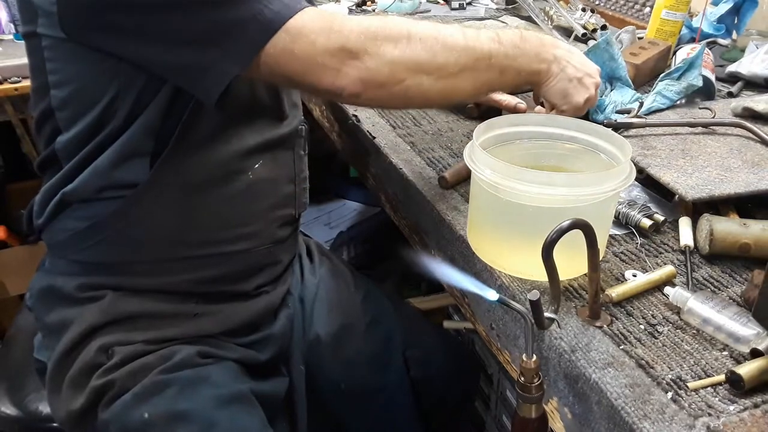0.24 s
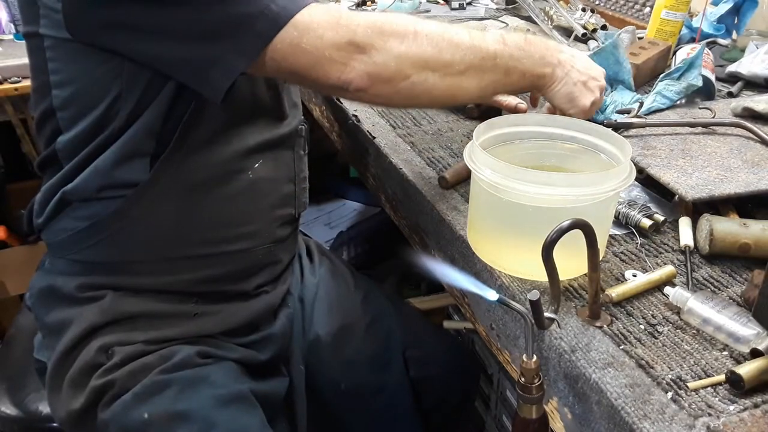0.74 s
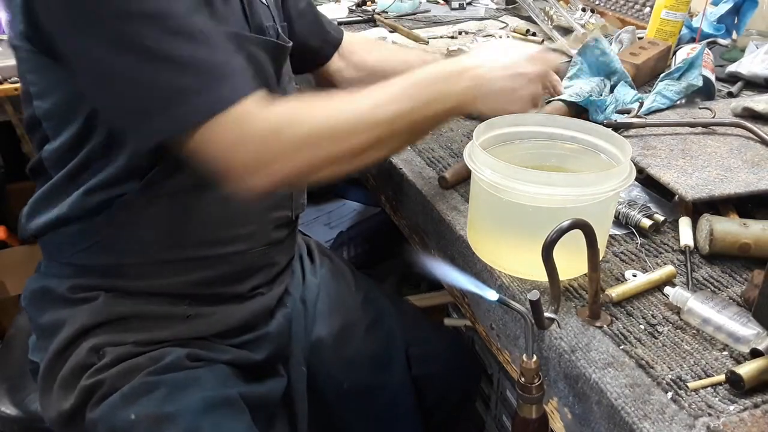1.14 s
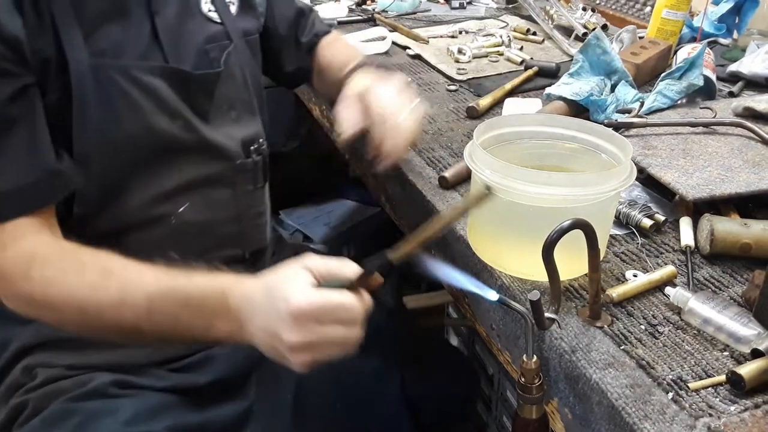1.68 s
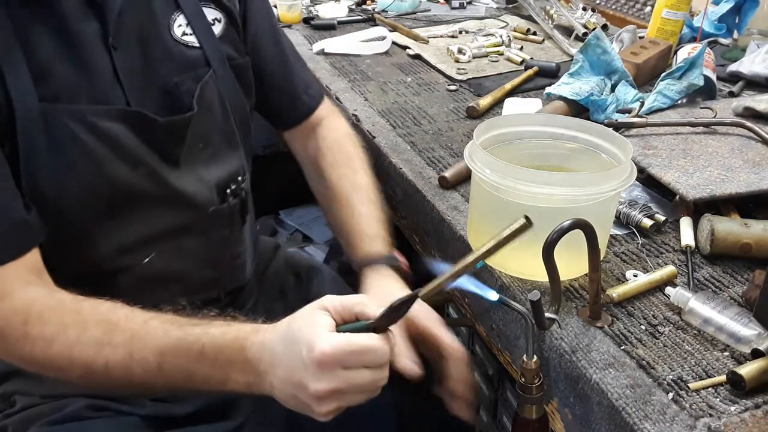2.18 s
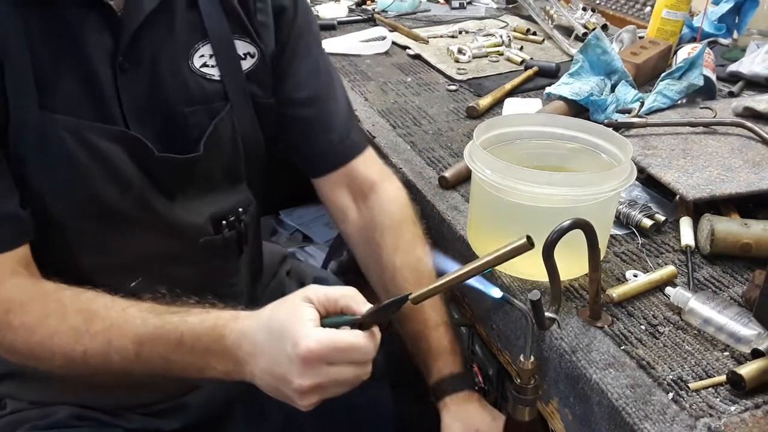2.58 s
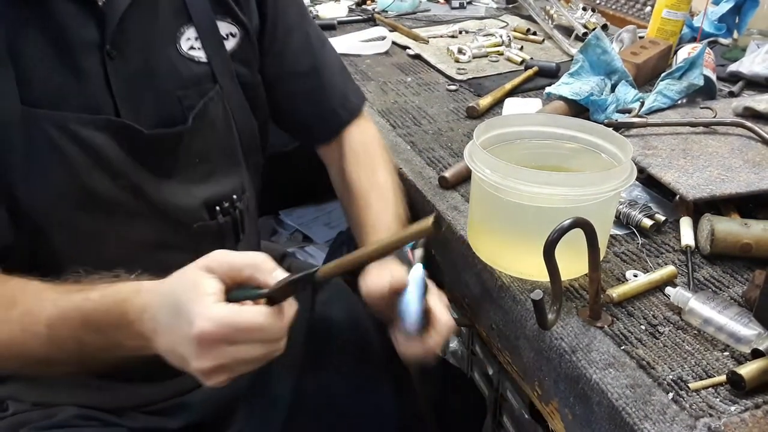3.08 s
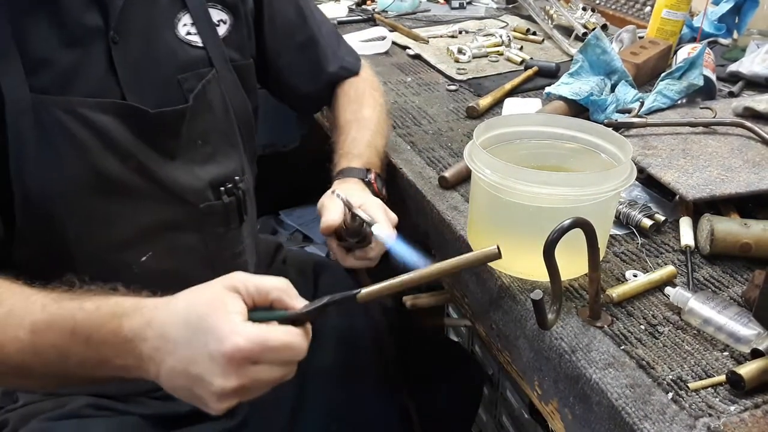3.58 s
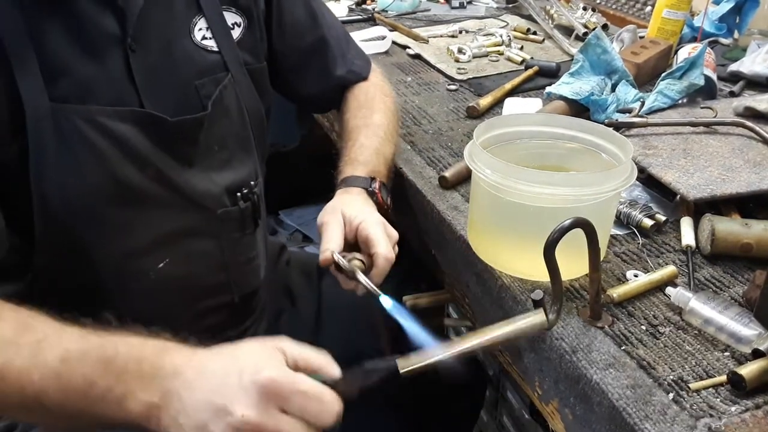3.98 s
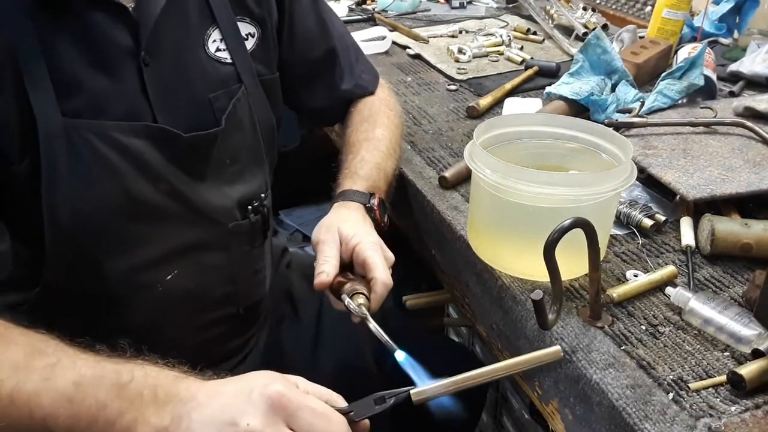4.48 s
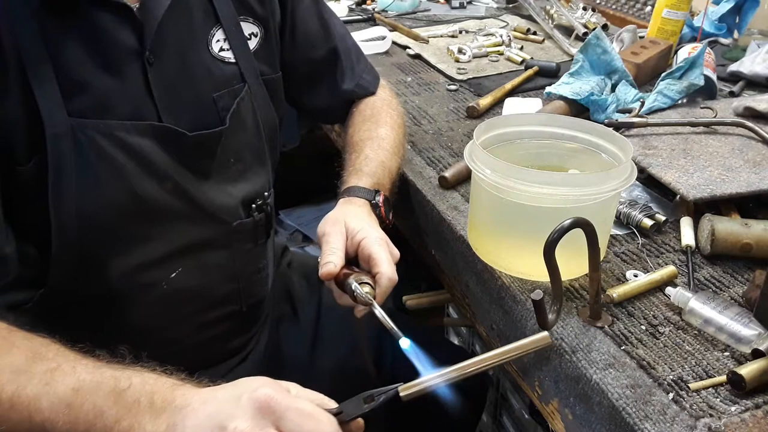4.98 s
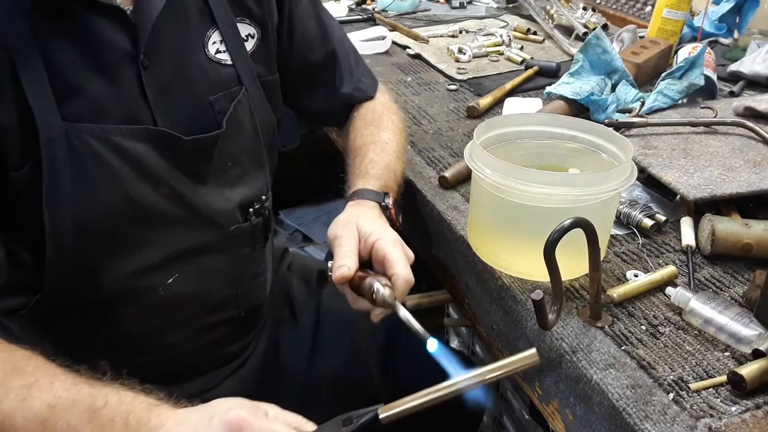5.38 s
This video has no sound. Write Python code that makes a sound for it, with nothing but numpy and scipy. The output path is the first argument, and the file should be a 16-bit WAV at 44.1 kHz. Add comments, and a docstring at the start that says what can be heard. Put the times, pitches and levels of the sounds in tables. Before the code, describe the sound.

Close in a small workshop, a burning gas torch gives a continuous bright hiss with a softer roar beneath. It stays steady on its stand, then around three seconds drops, dulls and wobbles as it is lifted and swung round, recovering by about four seconds as it is aimed at a metal tube. A quiet extractor fan rushes and hums throughout. Close stereo microphones, fairly dry.

```python
"""At a workshop bench, a gas torch hisses on its stand, is picked up, swung round and aimed at a brass tube.
The jet is turbulent noise coloured by the short pipe of the tip; the flame is a softer, lower band of noise.
A near surface returns an echo whose delay shifts as the torch moves; brief close reflections comb the hiss.
An extractor fan adds a steady rush of air and a few wavering motor tones."""
import sys
import numpy as np
from scipy import signal
from scipy.fft import rfft, irfft
from scipy.io import wavfile
from scipy.ndimage import uniform_filter1d

SR = 44100
rng = np.random.default_rng(int(sys.argv[2]) if len(sys.argv) > 2 else 0)


def file_out(sig):
    """Save sig as 16-bit WAV at sys.argv[1]."""
    # one column per channel
    cols = np.atleast_2d(sig).T
    # limit, then scale
    lim = np.clip(cols, -1, 1)
    pcm = np.round(lim * 32767).astype(np.int16)
    wavfile.write(sys.argv[1], SR, pcm)


N = 248988

# motion of the torch; pose 0 on the stand, 1 aimed, 2 turned away (clipped to 0-2): time_s, left_lead_ms, pose
TORCH_PATH = [(2.1, -0.006, 0.027), (2.7, -0.014, 0.41), (2.89, -0.02, 2.3), (3.08, 0.081, 2.1),
              (3.57, 0.13, 1.2), (4.03, 0.025, 1.13), (4.6, 0.034, 0.75), (5.4, 0.018, 1.2)]
# hiss at 3-5.6 kHz and above, before spreading, flares and flutter: time_s, level_db, treble_db
HISS_LEVELS = [(0, -31.5, -34), (0.55, -31.6, -34), (2.0, -34, -34.5), (2.45, -34, -35), (2.68, -33, -36),
               (2.75, -34.5, -36.5), (2.87, -36.5, -38.5), (2.98, -40, -43), (3.1, -39.5, -41),
               (3.31, -33.5, -37), (3.42, -41.5, -40), (3.53, -37, -41), (3.64, -37.5, -41.5),
               (3.82, -36, -37.5), (3.9, -37.3, -36.5), (4.01, -38.8, -34), (4.08, -34.5, -34.5),
               (4.3, -34.5, -35), (4.55, -34, -34.5), (4.8, -34, -35.5), (5.05, -34.5, -35.5),
               (5.25, -34.5, -34), (5.37, -35.5, -37.5), (5.5, -33.5, -34.5), (5.65, -33, -33)]
# left-right imbalance that the hiss approaches at the shortest waves: time_s, left_minus_right_db
TREBLE_BEAM = [(2.55, 0), (2.84, -5.5), (3.25, 0.5), (3.8, -2.5), (3.94, 10), (4.12, 6), (4.3, 2),
               (4.62, 4), (4.77, -1.5), (4.95, 2.5), (5.12, 0), (5.24, 3), (5.35, 10), (5.6, -1)]
# relative spectral density of the jet in each pose: frequency_hz, density_db
JET_STAND_SPECTRUM = [(1400, -21), (1850, -10.5), (2250, -4), (2730, -5), (3050, -6.5), (3400, -4),
                      (4190, -0.5), (4350, -2.5), (5150, -7), (5500, -7), (6670, -12.5), (7800, -10),
                      (9110, -15), (11060, -18), (11960, -11.5), (12550, -16.5), (13300, -16),
                      (14530, -22.5), (15700, -16.0)]
JET_AIMED_SPECTRUM = [(1400, -17), (1850, -7), (2520, -5), (3310, 1.5), (3580, -2), (4350, 1), (4700, -4),
                      (4890, 1.5), (5400, -5), (6170, -9.5), (7200, -9), (7700, -11), (8110, -7.5),
                      (8700, -11.5), (11060, -16), (11960, -9), (15100, -24), (15700, -11)]
JET_AWAY_SPECTRUM = [(1400, -16), (1850, -7), (3070, 3), (3190, -1.5), (3870, 5), (5080, -0.5), (7800, -12),
                     (8110, -6.5), (8430, -10.5), (10240, -12), (10640, -16), (11960, -8), (14530, -20),
                     (15700, -13)]
# gliding resonances and hollows of the hiss; where start_s exceeds end_s the lift acts with reversed sign:
# start_s, end_s, first_hz, last_hz, width_hz, left_lift_db, right_lift_db
JET_RESONANCES = [(-1, 1.15, 4740, 4750, 170, 0.5, 7.5), (-1, 1.2, 4400, 4600, 160, -4, -3.5),
                  (0.5, 2.58, 4160, 4120, 180, 2, 1), (-0.5, 2.56, 2050, 2160, 350, -1.5, -1.5),
                  (0.5, 2.7, 7600, 7600, 260, 4.5, -6), (2.57, 2.84, 4600, 5600, 340, 4, 3.5),
                  (3, 3.05, 4250, 4400, 380, -7, -2), (4, 2.85, 11900, 11100, 440, 7, 5),
                  (2.95, 3.42, 4300, 4800, 1500, -3, 1), (3, 3.25, 2550, 2700, 580, 2, 3.5),
                  (3, 3.12, 6000, 6300, 260, -9, -8), (4, 4.07, 4500, 4500, 1500, 2, -2.5),
                  (5, 5.3, 3500, 3700, 230, -2, -2.5), (3.4, 3.97, 4300, 4150, 380, -2, -2),
                  (3, 3.93, 4800, 5000, 470, 2.5, 2.5), (3, 4, 6300, 6500, 250, 4.5, 7),
                  (1.5, 3.7, 6800, 7950, 280, 3.5, 1.5), (3, 4.5, 6750, 7100, 500, -1, -7),
                  (4, 4.1, 10800, 10800, 600, 0, -4), (4.5, 4.5, 4150, 2600, 250, 3, 4),
                  (4.65, 5.1, 4300, 4550, 230, -0.5, 3), (5, 7, 6460, 6460, 100, 5, 3)]
# brief swells and dips of part of the hiss, near 4.6 kHz or in the top of the treble:
# centre_s, half_length_s, frequency_hz, width_hz, lift_db
JET_FLARES = [(1.07, 0.036, 4550, 1200, 2.5), (1.68, 0.04, 4530, 1200, 4), (2.66, .045, 4600, 900, 0.5),
              (4.3, 0.13, 12300, 3500, 0), (5.11, 0.028, 4600, 1200, 4), (5.1, .16, 12000, 3500, -1.5)]
# echo of the jet off a near surface: time_s, delay_ms, strength (pressure ratio)
SURFACE_ECHO = [(2.6, 5, .18), (2.9, 5.15, 0.28), (3.2, 5.15, 0.44), (3.35, 5.02, 0.6), (3.5, 5.08, .25),
                (3.75, 5.06, .5), (3.9, 4.98, .25), (4.15, 4.89, .4), (4.4, 4.85, 0.26), (4.7, 4.93, .33),
                (5.0, 5.1, .3), (5.35, 5.05, .35), (5.65, 4.97, 0.31)]
# diffuse sound at the bench by pitch, before the pose scales it: frequency_hz, diffuse_db
DIFFUSE_COLOUR = [(1750, 2), (2150, -3), (2800, -3.5), (3250, 3.5), (3650, -4), (4300, 2), (5700, -0.5),
                  (6800, 2.5), (7450, 2.5), (8250, 8), (9200, -2), (10200, 2.5), (15000, 7)]
# brief reflections off something close, such as the tube:
# start_s, end_s, first_delay_ms, last_delay_ms, strength (pressure ratio)
CLOSE_REFLECTIONS = [(3.28, 3.7, 1.26, 1.2, 0.16), (3.92, 4.05, 1.05, 0.97, 0.27),
                     (4.12, 4.22, .78, .72, 0.24)]
# relative spectral density of the flame in each pose: frequency_hz, density_db
FLAME_STAND_SPECTRUM = [(330, -37), (455, -2), (540, -14.5), (680, -6), (760, -11.5), (900, -15.5),
                        (1050, -4.5), (1200, -5.5), (1450, 0), (1630, -1), (1800, -7.5), (2100, -36)]
FLAME_AIMED_SPECTRUM = [(760, -11), (880, -22.5), (1000, 0.5), (1220, 1), (1350, -0.5), (1450, 1),
                        (1590, 2), (1720, -17), (2000, -19)]
FLAME_AWAY_SPECTRUM = [(740, -26), (860, -17), (960, -2.5), (1180, -3.5), (1330, -2.5), (1450, -1),
                       (1570, -2), (1680, -5), (2000, -19)]
# resonances and hollows of the roar as the flame passes the bench and the body:
# start_s, end_s, first_hz, last_hz, width_hz, lift_db
FLAME_RESONANCES = [(1.8, 3.4, 620, 650, 130, 5.5), (2, 2.9, 1400, 1470, 79, -7.5),
                    (1, 2.75, 820, 860, 100, -3), (-0.5, 1.2, 1420, 1430, 88, 3),
                    (2.55, 3.4, 1610, 1430, 90, 3.5), (3, 3.3, 920, 1000, 150, 3),
                    (3.5, 3.9, 1350, 1460, 120, -3), (3, 3.9, 1140, 1220, 100, 5),
                    (4, 4.7, 1170, 1400, 72, 4), (5.02, 5.4, 1350, 1410, 81, 4)]
# correlation of the roar at the two microphones: frequency_hz, correlation (0-1)
FLAME_CORRELATION = [(450, 1), (700, 0.9), (1000, 0.74), (1300, 0.75), (1700, 0.59)]
# relative spectral density of the fan's air noise: frequency_hz, density_db
FAN_SPECTRUM = [(20, -23), (60, -13.5), (110, -11), (150, -5), (215, 2), (260, -1.5), (285, -6), (380, -3),
                (450, 2.5), (540, -3.5), (650, 1), (745, -9.5), (820, -1), (2000, -21.5)]
# correlation of the air noise at the two microphones: frequency_hz, correlation (0-1)
FAN_CORRELATION = [(30, .82), (70, 0.76), (140, 0.93), (300, 0.89), (800, 0.72)]
# tones of the fan motor: frequency_hz, level_db
MOTOR_TONES = [(241.8, -50.5), (301, -60.5), (325, -60)]

FRAME, HOP = 2048, 512  # samples
TIME = np.arange(N) / SR
FRAME_TIME = np.arange(-(-N // HOP) + 1) * HOP / SR
HZ = np.fft.rfftfreq(FRAME, 1 / SR)[:, None]
TURN_PER_MS = 2j * np.pi * HZ / 1000  # phase turned by each ms of delay
SIDE = np.array([1, -1])[:, None, None]  # left, right

# share of power that arrives directly while the tip faces the microphones
DIRECT_SHARE = 0.94
# below this treble level the tip points away; slope 1.9 makes the direct power fall 0.95 dB per treble dB
FACING_TREBLE_DB, DIRECT_LOSS = -36, 1.9
LIFTED_S, NEW_CLUTTER_S = 2.55, 0.452  # from the lift on, the small reflections renew themselves this often
ROAR_DB, ROAR_HAND_DB = -42.5, 0.8  # base level of the roar at 0.9-1.8 kHz; rise in the hand
SWEEP_AT_S, SWEEP_S, SWEEP_DB = 2.9, 0.32, 0.9  # the flame roars up as it is swept off the stand
FAN_DB = -46.5  # rms level of the air noise


def amp(db):
    """Logarithmic level: decibels to a pressure ratio."""
    return 10 ** (np.asarray(db) / 20)


def unit(x):
    """Normalisation of mean power: scales to an rms of 1."""
    return x / np.sqrt(np.mean(x ** 2) + 1e-20)


def spectra(x):
    """Short-time Fourier analysis into bins x frames."""
    return signal.stft(x, nperseg=FRAME, noverlap=FRAME - HOP)[2]


def sound(z):
    """Overlap-add synthesis of short-time spectra into samples."""
    return signal.istft(z, nperseg=FRAME, noverlap=FRAME - HOP)[1][..., :N]


def controls(rows):
    """Linear interpolation in time: each column of a curve, read once a frame."""
    s, *columns = np.transpose(rows)
    return [np.interp(FRAME_TIME, s, column) for column in columns]


def colour(points):
    """Interpolation over logarithmic frequency, read at every bin."""
    hz, value = np.transpose(points)
    return np.interp(np.log(HZ + 1), np.log(hz), value)


def shape(points):
    """Band-limited spectrum in dB, falling 20 dB per octave beyond its ends."""
    inside = np.clip(HZ + 1, points[0][0], points[-1][0])
    octaves_outside = abs(np.log2((HZ + 1) / inside))
    return colour(points) - 20 * octaves_outside


def band_rms(gain, lo_hz, hi_hz):
    """Parseval's principle: rms that unit white noise has inside a band after this gain."""
    in_band = (HZ > lo_hz) * (HZ < hi_hz)
    return np.sqrt(np.mean(gain ** 2 * in_band, axis=-2, keepdims=True))


def drift(rate_hz):
    """Slow random fluctuation: band-limited noise of rms 1, up to about this rate."""
    hz = np.fft.rfftfreq(N, 1 / SR)
    band = hz / (hz + 2) / (1 + (hz / rate_hz) ** 2)
    return unit(irfft(rfft(rng.standard_normal(N)) * band, N))


def noise_pair(correlation):
    """Partial coherence: a sum and difference of two white noises set the likeness at two microphones."""
    common, apart = spectra(rng.standard_normal((2, N)))
    correlation = np.clip(correlation, -1, 1)
    return np.sqrt((1 + correlation) / 2) * common + SIDE * np.sqrt((1 - correlation) / 2) * apart


def pose_shares():
    """Linear crossfade: shares of stand, aimed and turned away in each frame; they sum to 1."""
    pose = np.clip(controls(TORCH_PATH)[-1], 0, 2)
    return [np.maximum(1 - abs(pose - k), 0) for k in range(3)]


def posed(*tables):
    """Directivity of a source: its spectrum in dB glides from pose to pose."""
    return sum(share * shape(table) for share, table in zip(pose_shares(), tables))


def presence(start, end, fade_s):
    """Smooth gating: a window with tanh flanks, negative if start follows end."""
    return (np.tanh((FRAME_TIME - start) / fade_s) - np.tanh((FRAME_TIME - end) / fade_s)) / 2


def resonance(start, end, first_hz, last_hz, width, fade_s):
    """Gliding resonance: a gated bell curve over frequency whose centre moves between two pitches."""
    hz = np.interp(FRAME_TIME, [start, end], [first_hz, last_hz])
    return presence(start, end, fade_s) / (1 + (2 * (HZ - hz) / width) ** 2)


def eddies(size=70):
    """Turbulence: random patches of rms 1, a frame or two long and a kilohertz or two wide."""
    field = rng.standard_normal((len(HZ), len(FRAME_TIME)))
    field = uniform_filter1d(field, size, axis=0, mode="wrap")
    return unit(uniform_filter1d(field, 2, axis=1))


def jet_colour(round_trip_ms=0.3233, end_reflection=0.35, fade_s=0.036, eddy_db=0.8):
    """Quarter-wave pipe: the tip lifts its odd harmonics in a hiss coloured by pose and turbulence."""
    db = posed(JET_STAND_SPECTRUM, JET_AIMED_SPECTRUM, JET_AWAY_SPECTRUM) + eddy_db * eddies()
    for *path, left_db, right_db in JET_RESONANCES:
        lift_db = np.reshape([left_db, right_db], SIDE.shape)
        db = db + lift_db * resonance(*path, fade_s)
    pipe = 1 / abs(1 + end_reflection * np.exp(-TURN_PER_MS * round_trip_ms))
    return amp(db) * pipe


def clutter(x, t60=0.067):
    """Exponential decay: many small reflections off the bench and tools, different at each microphone."""
    t = TIME[:SR // 5]
    tail = rng.standard_normal((2, len(t))) * amp(-60 * t / t60)
    tail = tail / np.linalg.norm(tail[0])
    return spectra(signal.fftconvolve(x[None], tail, axes=1)[:, :N])


def arrival(scatter=0.43, soak_hz=8000, spacing_ms=0.11):
    """Superposition of paths: direct, one echo, scattered and diffuse jet noise at two close microphones."""
    lead_ms = controls(TORCH_PATH)[0]
    echo_ms, echo = controls(SURFACE_ECHO)
    treble_db = controls(HISS_LEVELS)[1]
    turned_db = np.minimum(treble_db - FACING_TREBLE_DB, 0)
    direct = np.clip(DIRECT_SHARE * amp(DIRECT_LOSS * turned_db), 0, 1)
    away = pose_shares()[2]
    gas = rng.standard_normal(N)
    near = spectra(gas) * np.exp(SIDE * TURN_PER_MS * lead_ms / 2)
    straight = near * (np.sqrt(direct) + echo * np.exp(-TURN_PER_MS * echo_ms))
    # the clutter swallows the shortest waves
    scatter = scatter / np.sqrt(1 + (HZ / soak_hz) ** 2)
    early = scatter * moving_clutter(gas)
    # sound from all sides is alike at both microphones only for waves much longer than their spacing
    late = np.sqrt(1 - direct) * noise_pair(np.sinc(TURN_PER_MS.imag * spacing_ms / np.pi))
    wet = amp((1.5 - away) * colour(DIFFUSE_COLOUR))
    power = direct + echo ** 2 + wet ** 2 * (scatter ** 2 + 1 - direct)
    return (straight + wet * (early + late)) / np.sqrt(power)


def jet(flutter_db=0.25, flutter_hz=20, spread=0.63, spread_hz=3000, shadow_hz=5200):
    """Jet noise and directivity: the treble is beamed and fades when the tip turns away."""
    level_db, treble_db = controls(HISS_LEVELS)
    pan_db, = controls(TREBLE_BEAM)
    gain = jet_colour()
    gain = gain / band_rms(gain, 3000, 5600).mean(0)
    beamed = .5 + .5 * np.tanh((HZ - 5500) / 500)
    treble_gain = amp(treble_db - level_db) / band_rms(gain, 5600, 15700).mean(0)
    gain = gain * treble_gain ** beamed
    # the low end of the hiss spreads all round, so it follows the aim less
    all_round = spread / (1 + (HZ / spread_hz) ** 8)
    steadied_db = level_db + all_round * (np.median(level_db) - level_db)
    gain = gain * amp(steadied_db + flares())
    # only short waves are shaded from one microphone
    shadow = amp(SIDE * pan_db / 2 / (1 + (shadow_hz / (HZ + 1)) ** 4))
    shadow = shadow / np.sqrt(np.mean(shadow ** 2, axis=0))
    hiss = sound(arrival() * glances() * gain * shadow)
    return hiss * amp(flutter_db * drift(flutter_hz))


def flame(flicker_db=0.32, flicker_hz=10, fade_s=0.052):
    """Combustion noise: a soft, wide roar that swells and turns hollow as the flame swings away."""
    in_hand = 1 - pose_shares()[0]
    sweep = np.exp(-((FRAME_TIME - SWEEP_AT_S) / SWEEP_S) ** 4)
    roar_db = ROAR_DB + ROAR_HAND_DB * in_hand + SWEEP_DB * sweep
    rings_db = sum(db * resonance(*path, fade_s) for *path, db in FLAME_RESONANCES)
    gain = amp(posed(FLAME_STAND_SPECTRUM, FLAME_AIMED_SPECTRUM, FLAME_AWAY_SPECTRUM) + rings_db)
    gain = gain / band_rms(gain, 900, 1800)
    roar = sound(noise_pair(colour(FLAME_CORRELATION)) * gain * amp(roar_db))
    return roar * amp(flicker_db * drift(flicker_hz))


def fan(waver=0.14, waver_hz=3, wander=0.21):
    """Flow noise and motor tones: steady shaped noise with sines that waver in strength and phase (rad)."""
    air = noise_pair(colour(FAN_CORRELATION)) * amp(shape(FAN_SPECTRUM))
    rush = amp(FAN_DB) * unit(sound(air))
    hum = np.zeros(N)
    for hz, db in MOTOR_TONES:
        tone = np.sin(2 * np.pi * hz * TIME + wander * drift(waver_hz))
        hum += amp(db) * unit(tone * (1 + waver * drift(waver_hz)))
    return rush + hum


def flares():
    """Transient change of level in a band: bells in time and frequency, summed in dB."""
    return sum(db * np.exp(-((FRAME_TIME - s) / half_s) ** 2) / (1 + (2 * (HZ - hz) / width) ** 2)
               for s, half_s, hz, width, db in JET_FLARES)


def moving_clutter(gas, count=8):
    """Position-dependent scattering: one set of reflections on the stand, then one after another in travel."""
    step = np.clip((FRAME_TIME - LIFTED_S) / NEW_CLUTTER_S, 0, count - 1)
    return sum(np.sqrt(np.maximum(1 - abs(step - k), 0)) * clutter(gas) for k in range(count))


def glances(fade_s=.03):
    """Comb filtering: a close reflection of gliding delay interferes with the hiss."""
    comb = 1
    for start, end, first_ms, last_ms, strength in CLOSE_REFLECTIONS:
        delay_ms = np.interp(FRAME_TIME, [start, end], [first_ms, last_ms])
        echo = strength * presence(start, end, fade_s)
        comb = comb * (1 + echo * np.exp(-TURN_PER_MS * delay_ms)) / np.sqrt(1 + echo ** 2)
    return comb


def scene():
    """Linear superposition of jet, flame and fan."""
    return jet() + flame() + fan()


def record(dry, notch_hz=14800, notch_depth=0.35, edge_hz=15740):
    """Linear filtering: a narrow dip of the microphone ports, then a steep upper band limit."""
    notched = signal.lfilter(*signal.iirnotch(notch_hz, 25, SR), dry)
    dipped = dry + notch_depth * (notched - dry)
    taps = signal.firwin(511, edge_hz, window=("kaiser", 9), fs=SR)
    return signal.oaconvolve(dipped, taps[None], "same")


dry = scene()
out = record(dry)
file_out(out)
```